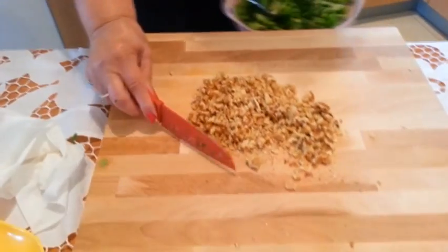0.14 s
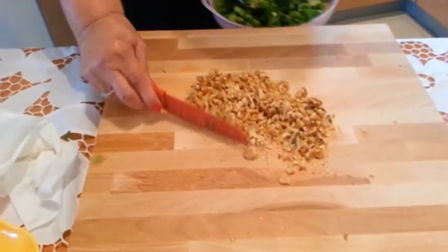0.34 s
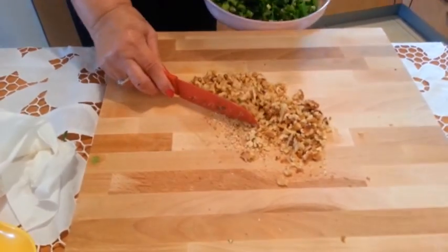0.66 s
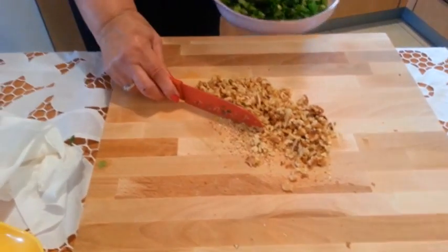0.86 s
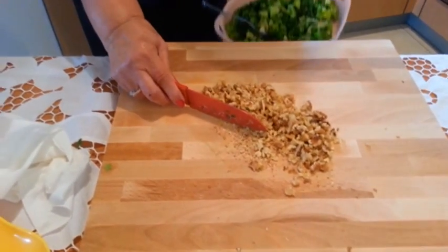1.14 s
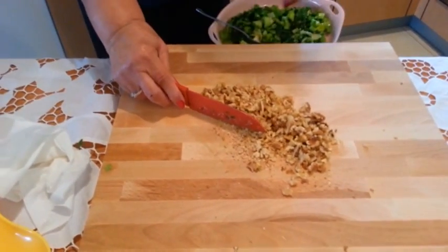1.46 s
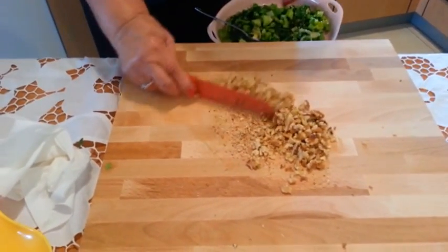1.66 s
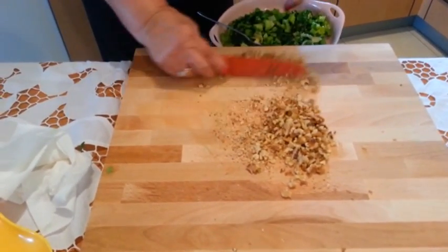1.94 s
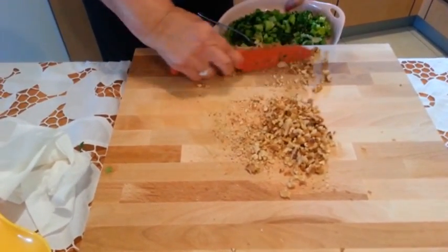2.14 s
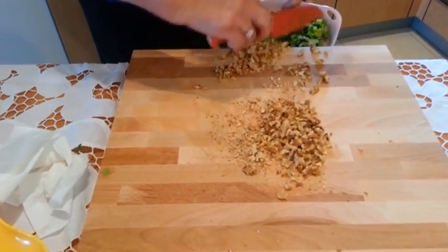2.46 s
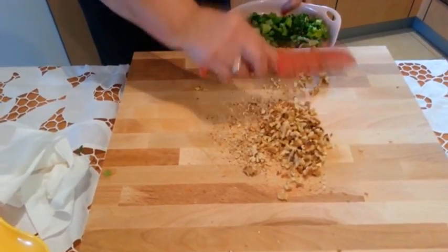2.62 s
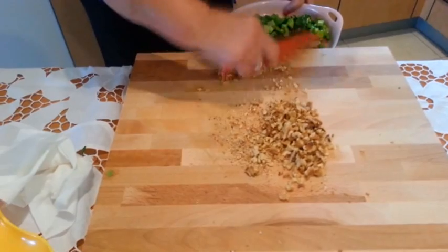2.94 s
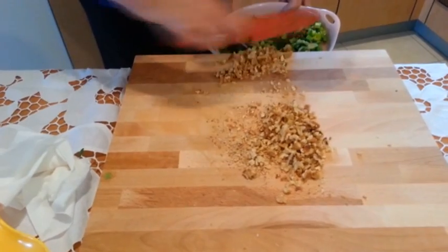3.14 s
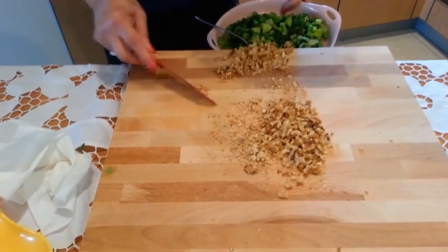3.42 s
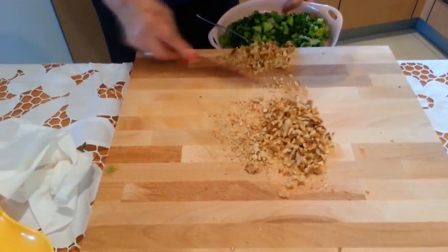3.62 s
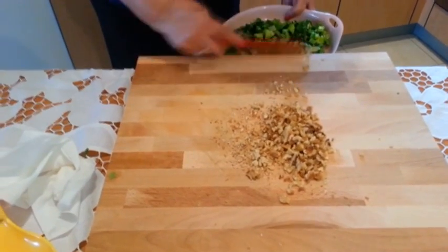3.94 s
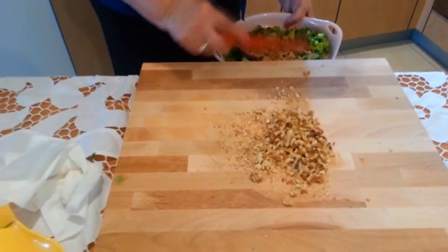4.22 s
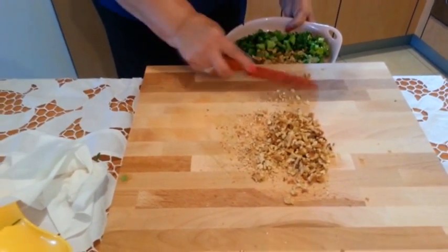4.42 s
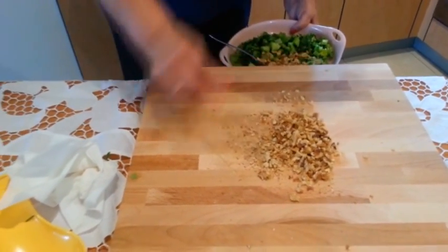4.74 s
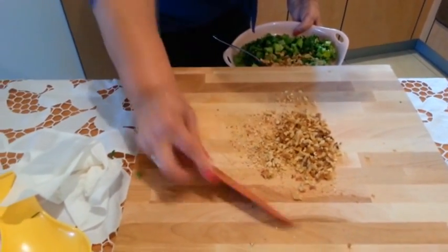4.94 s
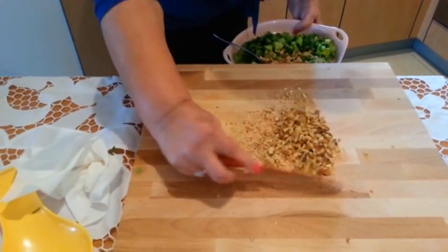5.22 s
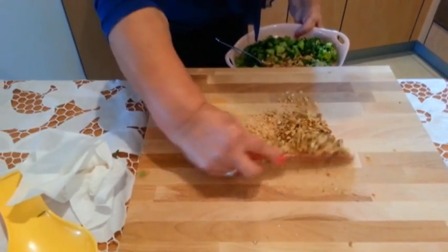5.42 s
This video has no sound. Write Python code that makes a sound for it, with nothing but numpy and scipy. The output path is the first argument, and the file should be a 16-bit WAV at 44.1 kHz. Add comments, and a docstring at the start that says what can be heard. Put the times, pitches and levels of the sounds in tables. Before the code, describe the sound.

Gritty sweeps of a blade pushing nut pieces across wood, with faint bowl clinks, hard woody knocks and a final rasp over a wavering low hum.

```python
"""A small kitchen: a knife sweeps chopped walnuts across a wooden board and over its edge into a bowl.
The blade rasps as noisy contacts ring crumb and blade resonances; knocks, bumps and faint bowl clinks
are sums of dying modes, some with noise; snaps are short noise bursts and squeals are narrow noise.
Echoes answer the work over a wavering sine hum, a noisy rumble and drone, and faint hiss."""
import sys
import numpy as np
from scipy import signal
from scipy.fft import rfft, irfft, next_fast_len
from scipy.io import wavfile
from scipy.ndimage import map_coordinates

SR = 44100
rng = np.random.default_rng(int(sys.argv[2]) if len(sys.argv) > 2 else 0)


def dump(signal):
    """Clip the signal to [-1, 1] and save it as 16-bit WAV at the path in sys.argv[1]."""
    limited = np.clip(np.atleast_2d(signal).T, -1, 1)
    pcm = np.round(limited * 32767).astype(np.int16)
    wavfile.write(sys.argv[1], SR, pcm)


N = 245637
TIME = np.arange(N) / SR

# resonances of the blade: [f/Hz, width/Hz, relative level/dB]
BLADE_MODES = [(2030, 135, -0.5), (3340, 150, -6), (4043, 130, 3), (4460, 160, -12), (5150, 160, 0),
               (5630, 150, -7.5), (6470, 130, 2), (7170, 95, -2), (7700, 105, 2.5), (8400, 56, 4),
               (10040, 320, 8.5), (12000, 260, 7.5), (13300, 320, -1.5)]
# colour of the rasp in a long sweep, also of a snapping nut: [f/Hz, relative level/dB]
SWEEP_SPECTRUM = [(760, -5.5), (1300, -0.5), (1640, -12), (1960, -5), (2600, -8.5), (4400, -10),
                  (5500, -4.5), (6500, -8.5), (7400, -5.5), (10200, -21.5), (12100, -18.5), (15000, -40)]


def from_db(db):
    """Decibels to gain."""
    return 10 ** (np.asarray(db) / 20)


def rms_one(x):
    """Scale to rms 1."""
    return x / np.sqrt(np.mean(x ** 2) + 1e-20)


def attack_one(x):
    """Scale to rms 1 over the first 10 ms."""
    return x / np.sqrt(np.mean(x[:SR // 100] ** 2))


def at_hz(points, hz):
    """Read a table on a log-frequency axis."""
    f, value = np.transpose(points)
    return np.interp(np.log(np.maximum(hz, 1)), np.log(f), value)


def add(out, s, sound):
    """Mix a sound in at time s."""
    at = max(0, round(s * SR))
    out[at:at + len(sound)] += sound[:N - at]


def drift(rate):
    """Smooth random wandering of rms 1 through rate new values a second."""
    knots = rng.standard_normal(4096)
    coarse = map_coordinates(knots, [TIME[::32] * rate], order=3, mode="wrap")
    return rms_one(coarse).repeat(32)[:N]


def colour(x, spectrum):
    """Causal (minimum-phase) filter that follows a spectrum."""
    size = 2 * next_fast_len(len(x))
    bins_hz = np.arange(size // 2 + 1) * SR / size
    cepstrum = irfft(np.log(from_db(at_hz(spectrum, bins_hz))))
    # folding the cepstrum onto positive time makes the phase minimal
    cepstrum[1:size // 2] *= 2
    cepstrum[size // 2 + 1:] = 0
    return irfft(rfft(x, size) * np.exp(rfft(cepstrum)))[:len(x)]


def resonance(x, hz, width):
    """Two-pole resonance with gain 1 on top; a narrower width (Hz) rings longer."""
    r = np.exp(-np.pi * width / SR)
    zeros = np.array([1, 0, -1]) * (1 - r * r) / 2
    poles = [1, -2 * r * np.cos(2 * np.pi * hz / SR), r * r]
    return signal.lfilter(zeros, poles, x + 1e-18)


def favour(hz, centre_hz, per_octave_db):
    """A contact wakes the modes near its own pitch best; dB."""
    return -per_octave_db * np.abs(np.log2(np.asarray(hz) / centre_hz))


def struck(modes, vary_db, scatter_rad=0):
    """Modes rung by one blow, each of random strength; scattered phases soften the first peak. Peak 1."""
    t = TIME[:SR // 2]
    y = 0
    for hz, db, t60 in modes:
        fall = from_db(db + vary_db * rng.normal() - 60 * t / t60)
        y = y + fall * np.sin(2 * np.pi * hz * t + scatter_rad * rng.normal())
    y = y * np.minimum(t / .0003, 1)   # 0.3 ms attack
    return y / np.abs(y).max()


def burst(t60):
    """Half a second holding the dying noise of one contact."""
    t = TIME[:SR // 2]
    return rng.standard_normal(len(t)) * from_db(-60 * t / t60)


def room_tone(rumble_db, drone_db, waver_db, waver_rad):
    """A sine hum wavers in level and phase inside a slowly swelling low drone and rumble, under hiss."""
    # noise colours of the room: [f/Hz, relative level/dB]
    rumble_colour = [(20, -37), (38, -30), (52, -4.5), (62, 4.5), (78, -9.5), (95, 15.5), (112, -4.5),
                     (135, 8.5), (200, -77)]
    drone_colour = [(90, -42), (125, -0.5), (150, 4), (190, 1), (250, -3), (320, -12), (380, -14),
                    (450, -27), (700, -56.5)]
    air_colour = [(30, -33), (300, 5), (700, 2), (1300, -9), (2200, -9.5), (4000, -19), (8000, -21.5),
                  (14300, -34), (15100, -57)]
    # slow swells, before their trims: [t/s, level/dB]
    rumble_swell = [(0.0, -42.5), (2.89, -47), (3.68, -35), (3.79, -41.5), (4.82, -29.5), (4.87, -40),
                    (5.57, -38)]
    drone_swell = [(0.0, -42), (0.15, -40), (3.85, -30.5), (4.37, -37.5), (4.44, -30.5), (5.57, -31)]
    hum_hz, hum_db, air_db = 151.5, -42.5, -52

    def noise(spectrum):
        """Steady coloured noise of rms 1."""
        return rms_one(colour(rng.standard_normal(N), spectrum))

    rumble = from_db(np.interp(TIME, *np.transpose(rumble_swell)) + rumble_db) * noise(rumble_colour)
    drone = from_db(np.interp(TIME, *np.transpose(drone_swell)) + drone_db) * noise(drone_colour)
    hum_phase = 2 * np.pi * hum_hz * TIME + waver_rad * drift(rate=4.0)
    hum = from_db(hum_db + waver_db * drift(rate=8.1)) * np.sin(hum_phase)
    return rumble + drone + hum + from_db(air_db) * noise(air_colour)


def kitchen(x, first_echo_s):
    """Diffuse echoes from the walls build up after a short gap; each band dies at its own rate."""
    # decay of the room: [f/Hz, t60/s]
    room_decay = [(150, 1), (600, 0.43), (1500, 0.5), (4000, 0.44), (10000, 0.3)]
    t, tail = TIME[:SR * 3 // 4], 0
    edges = np.geomspace(70, 17000, 9)
    for low, high in zip(edges, edges[1:]):
        band_filter = signal.butter(2, [low, high], "band", fs=SR, output="sos")
        band = signal.sosfilt(band_filter, rng.standard_normal(len(t)))
        tail = tail + band * from_db(-60 * t / at_hz(room_decay, np.sqrt(low * high)))
    tail = tail * np.minimum(t / first_echo_s, 1) ** 4
    return signal.fftconvolve(x, tail / np.sqrt(np.sum(tail ** 2)))[:N]


def bumps(level_db):
    """Soft blows that only wake the table's low modes; the deepest bass is cut away."""
    # dull bumps, before trim and bass cut: [t/s, level/dB]
    bump_times = [(0.106, -29.5), (1.188, -22.5), (5.143, -28)]
    # low modes of the table: [f/Hz, relative level/dB, t60/s]
    table_modes = [(150, -2, 0.086), (185, -10, 0.085), (235, 1.5, 0.06), (336, -5, 0.048)]
    out = np.zeros(N)
    for s, db in bump_times:
        add(out, s, from_db(db + level_db) * struck(table_modes, vary_db=9))
    return signal.sosfilt(signal.butter(2, 100, "high", fs=SR, output="sos"), out)


def clinks(level_db, contact_db, settle_s):
    """Light, rattling touches build up for a moment and ring the bowl, whose close modes beat."""
    # clinks in the bowl, before the trim: [t/s, level/dB, centre of the ring f/Hz]
    clink_times = [(0.106, -23, 3200), (0.114, -22.5, 3930), (0.123, -26.5, 4900), (0.899, -47.5, 4900),
                   (0.946, -45, 3400), (2.163, -35, 3400), (2.725, -37, 3780), (3.042, -33, 3900),
                   (3.109, -31, 5230), (3.197, -39.5, 4600), (4.017, -26, 2640), (4.06, -33.5, 3601)]
    # modes of the bowl: [f/Hz, relative level/dB, t60/s]
    bowl_modes = [(1730, 0, 0.12), (1975, 4, 0.12), (2640, -1.5, 0.29), (2744, 2.5, 0.16), (3200, -6, 0.11),
                  (3580, -1.5, 0.16), (3860, -0.5, 0.093), (4900, 1, 0.22), (5070, -5, 0.2),
                  (5750, -4, 0.14), (6505, 0, 0.15)]
    # colour of the touch itself: [f/Hz, relative level/dB]
    rattle_colour = [(300, 7), (1400, -1.5), (2300, 4.5), (5500, 0.5), (9000, -9), (14000, -41)]
    out = np.zeros(N)
    settle = np.minimum(TIME[:SR // 2] / settle_s, 1)
    for s, db, centre_hz in clink_times:
        modes = [(hz, level + favour(hz, centre_hz, per_octave_db=4.5), t60)
                 for hz, level, t60 in bowl_modes]
        rattle = from_db(contact_db) * attack_one(colour(burst(t60=0.1), rattle_colour))
        ring = struck(modes, vary_db=3.0, scatter_rad=1.86)
        add(out, s, from_db(db + level_db) * settle * (ring + rattle))
    return out


def snaps(level_db):
    """Dry noise ticks of single nut pieces that snap under the blade or tumble off the edge."""
    # loudest snaps, before the trim: [t/s, rms level of the first 10 ms/dB]
    snap_times = [(0.795, -33), (1.188, -26), (1.345, -42), (1.518, -31), (1.726, -18), (1.954, -21),
                  (2.053, -24), (2.212, -32), (2.406, -33), (2.455, -38), (2.485, -35), (2.869, -23.5),
                  (3.328, -37)]
    out = np.zeros(N)
    for s, db in snap_times:
        add(out, s, from_db(db + level_db) * attack_one(colour(burst(t60=0.075), SWEEP_SPECTRUM)))
    return out


def squeals(fade_s):
    """Friction feeds one mode of the sliding blade for a moment: noise through a narrow resonance, twice."""
    # brief singing of the blade: [start t/s, end t/s, f/Hz, rms level/dB]
    squeal_times = [(3.59, 3.65, 6545, -39), (3.86, 3.884, 8446, -38), (5.295, 5.33, 8446, -43)]
    width_hz = 250   # of each resonance
    out = np.zeros(N)
    for start, end, hz, db in squeal_times:
        touch = np.clip(np.minimum(TIME - start, end - TIME) / fade_s + .5, 0, 1)
        once = resonance(rng.standard_normal(N), hz, width_hz)
        tone = resonance(once, hz, width_hz)
        out += touch * from_db(db) * rms_one(tone)
    return out


def blade_tick(centre_hz, ring_db):
    """A short bright contact and the blade's ring, both strongest near one pitch before a shared colour."""
    # colour of the whole tick: [f/Hz, relative level/dB]
    tick_colour = [(1800, 4.5), (3500, 2.5), (10000, -7.5), (15500, -25)]
    octaves_hz = centre_hz * 2. ** np.arange(-2, 3)
    contact_colour = [(hz, favour(hz, centre_hz, per_octave_db=2.0)) for hz in octaves_hz]
    contact = colour(burst(t60=0.028), contact_colour)
    ring = 0
    for hz, width, db in BLADE_MODES:
        gain = from_db(ring_db + db + favour(hz, centre_hz, per_octave_db=49))
        ring = ring + gain * resonance(contact, hz, width)
    return attack_one(colour(contact + ring, tick_colour))


def knocks(thud_db, board_db, crack_db, tick_db):
    """The blade lands: contact thuds and cracks, board and blade ring. Gives (board, contact, blade)."""
    # blade on board, levels before their trims: [t/s, thud level/dB, board ring level/dB,
    # board ring centre f/Hz, crack level/dB, blade tick level/dB, blade tick centre f/Hz]
    knock_times = [(1.187, -26, -32, 450, -30, -50, 1500), (1.718, -24, -30, 612, -31, -54, 5600),
                   (3.385, -14, -23, 753.8, -28, -43, 1800), (3.737, -22, -20, 760, -18, -28, 6300),
                   (3.752, -24, -11, 710, -38, -47, 6350), (3.884, -22, -20.5, 800, -33, -29, 7900),
                   (4.41, -10.5, -12, 776, -7, -22.5, 4695), (4.44, -7, -25, 745, -9.5, -25.5, 6550),
                   (4.473, -9, -20, 748, -10.5, -21.5, 8700), (4.926, -8.5, -17, 870, -9.5, -23, 4300),
                   (4.94, -16, -12, 850, -10, -26, 4450), (5.059, -24, -36, 750, -30, -29.5, 4900),
                   (5.086, -7, -6, 820, -13, -32.5, 4460), (5.101, -26, -32, 900, -23, -30.5, 4140),
                   (5.111, -18, -29, 600, -20, -28.5, 4600), (5.126, -21, -24, 800, -25, -35.5, 4650),
                   (5.144, -5, -4, 545, -12, -29.5, 7060), (5.158, -24, -26, 650, -27, -42, 5000),
                   (5.171, -18, -20, 443, -30, -31.5, 6450), (5.232, -14, -20, 800, -32, -33, 4900),
                   (5.266, -4, -10, 660, -16, -24, 3000), (5.293, -30, -21, 600, -24, -25, 8050)]
    # lasting board modes, damped thud at the contact, short-lived upper modes woken by a sharp
    # contact: [f/Hz, relative level/dB, t60/s]
    board_modes = [(377, -10, 0.046), (460, -4.5, 0.12), (655, -5.5, 0.19), (699, 2, 0.13), (800, 6, 0.052),
                   (877, -3, 0.073), (995, -19, 0.12)]
    thud_modes = [(690, 4, 0.019), (800, 1, 0.022), (970, -1, 0.018)]
    crack_modes = [(1160, -1.5, 0.026), (1325, 1.5, 0.013), (1530, 2.5, 0.0097), (1800, 1.5, 0.016),
                   (2124, 0, 0.015), (2410, 1, 0.013)]
    soft_db_per_octave = 51   # a soft contact hardly wakes the modes above its own pitch
    board, contact, blade = np.zeros((3, N))
    for s, thud, ring, board_hz, crack, tick, blade_hz in knock_times:
        low_modes = [(hz, db + favour(hz, board_hz, per_octave_db=24.0), t60)
                     for hz, db, t60 in board_modes]
        high_modes = [(hz, db - soft_db_per_octave * max(0, np.log2(hz / blade_hz)), t60)
                      for hz, db, t60 in crack_modes]
        add(board, s, from_db(ring + board_db) * struck(low_modes, vary_db=8.5))
        add(contact, s, from_db(thud + thud_db) * struck(thud_modes, vary_db=3.5))
        add(contact, s, from_db(crack + crack_db) * struck(high_modes, vary_db=2.5, scatter_rad=1.9))
        add(blade, s, from_db(tick + tick_db) * blade_tick(blade_hz, ring_db=11.5))
    return board, contact, blade


def grains(per_s, spread_db):
    """Tiny contacts at random times, of random sign and exponentially scattered dB size; rms 1."""
    sizes = from_db(spread_db * np.minimum(rng.exponential(1, N), 4)) * rng.choice([-1, 1], N)
    return rms_one(sizes * (rng.random(N) < per_s / SR))


def crumbs(contacts, cycles, shift_db, count=20):
    """Each contact rings one crumb size for a few cycles; sizes crunch in clusters, so the pitch hops."""
    dealt = rng.integers(0, count, N)
    out = 0
    for k, hz in enumerate(np.geomspace(1500, 14000, count)):
        ring = resonance(contacts * (dealt == k), hz, hz / cycles)
        out = out + ring * from_db(shift_db * drift(rate=70))
    return rms_one(out)


def pressure(kind):
    """Strokes set in, swell to the hardest press (or dip, if negative), lift off. Gives (rasp, board) gains."""
    # strokes of the blade, levels before their trims: [start t/s, hardest press t/s, end t/s,
    # rasp level/dB, board drone level/dB, swell level/dB, kind]
    stroke_times = [(-0.02, 0.0, 0.082, -39.5, -48.5, 11, "nudge"),
                    (0.097, 0.167, 0.22, -45.5, -41.5, -6.5, "nudge"),
                    (0.253, 0.308, 0.32, -34, -38, 2.5, "nudge"),
                    (0.325, 0.453, 0.61, -39.5, -40, -0.5, "nudge"),
                    (0.79, 0.812, 0.94, -54.5, -56, 5, "brush"),
                    (1.527, 1.638, 1.767, -39.5, -36.5, 6, "sweep"),
                    (1.727, 1.78, 1.882, -34, -34, 3, "sweep"),
                    (1.89, 1.923, 2.01, -32.5, -37.5, 6.5, "sweep"),
                    (1.976, 2.006, 2.23, -43, -47, 8, "spill"), (2.209, 2.217, 2.3, -46, -65, 7, "spill"),
                    (2.34, 2.465, 2.61, -50.5, -64, 9, "spill"),
                    (2.765, 2.85, 2.96, -40.5, -45, 5.5, "sweep"),
                    (3.493, 3.54, 4.03, -32.5, -39.5, 13, "shove"),
                    (3.545, 3.627, 3.65, -30, -32, 8, "shove"), (3.671, 3.735, 3.79, -29, -24, 5, "shove"),
                    (3.794, 3.857, 3.885, -28.5, -30.5, 2.5, "shove"),
                    (3.96, 4.04, 4.06, -42.5, -62.5, 3, "brush"), (4.94, 4.93, 5.09, -27, -25.5, 8, "skid"),
                    (5.1, 5.157, 5.18, -39, -36, 9, "skid"), (5.29, 5.452, 5.74, -32, -28.5, 6.5, "gather")]
    attack_s, release_s = 0.03, 0.016
    board_swell_db = 3.5   # the board answers to pressure more than the crumbs do
    surge_db, surges_per_s = 0.32, 24   # the heap gives way unevenly
    rasp, board = np.zeros((2, N))
    for start, hardest, end, rasp_db, board_db, swell_db, row_kind in stroke_times:
        if row_kind != kind:
            continue
        set_in = np.clip((TIME - start) / attack_s + .5, 0, 1)
        lift_off = np.clip((end - TIME) / release_s + .5, 0, 1)
        touch = set_in * lift_off
        ease = np.interp(TIME, [start, hardest, end], [1, 0, 1])
        rasp += touch * from_db(rasp_db - swell_db * ease)
        board += touch * from_db(board_db - (swell_db + board_swell_db) * ease)
    return np.array([rasp, board]) * from_db(surge_db * drift(rate=surges_per_s))


def stroke(kind, spectrum, rasp_db, board_db, per_s, spread_db, catch_db, ring_db, dull_db=0):
    """Crumbs catch and slip under the edge; the same contacts drive the blade and the board."""
    # the board under a dragging blade: [f/Hz, relative level/dB]
    rub_colour = [(70, -44.5), (230, -16.5), (350, -9.5), (440, -11), (550, -3), (660, 0.5), (790, 2),
                  (920, -9), (1100, -3.5), (1400, -23.5), (1900, -28), (3000, -57)]
    contacts = grains(per_s, spread_db) * from_db(catch_db * drift(rate=80))
    # the blade's resonances come and go as the point of contact wanders
    steel = rms_one(sum(from_db(db + 3.5 * drift(rate=28)) * resonance(contacts, hz, width)
                        for hz, width, db in BLADE_MODES))
    crunch = crumbs(contacts, cycles=12.0, shift_db=4.0)
    rasp = rms_one(colour(crunch + from_db(ring_db) * steel, spectrum))
    # a light touch is duller on the wood: dull_db per octave
    wood_colour = [(hz, db - dull_db * np.log2(hz)) for hz, db in rub_colour]
    wood = rms_one(colour(contacts, wood_colour))
    rasp_gain, board_gain = pressure(kind)
    return rasp * rasp_gain * from_db(rasp_db) + wood * board_gain * from_db(board_db)


def scraping():
    """Light tip strokes, faint brushes, long sweeps, spilling pieces, hard shoves, skids and a gathering."""
    # colour of the rasp in each kind of stroke: [f/Hz, relative level/dB]
    nudge_colour = [(760, 10.5), (1300, 3), (1820, -11.5), (2020, -3), (3890, -11), (8370, -3.5),
                    (11000, -23.5), (12200, -18), (15000, -35)]
    brush_colour = [(760, -2), (2000, 0), (3500, -3), (6500, -0.5), (9000, -8), (12000, -15.5),
                    (15000, -40)]
    shove_colour = [(760, -47), (1300, 7), (1450, -15.5), (2310, -3), (4400, -2.5), (5970, -0.5), (6550, 0),
                    (8300, -5), (10000, -14), (12200, -16.5), (15000, -37)]
    skid_colour = [(760, -21), (1300, -6), (3300, -14), (4150, -8), (7870, -17), (11100, -33), (14100, -30),
                   (15000, -70)]
    gather_colour = [(760, -16), (1300, 1.5), (3580, -5.5), (5170, 4), (6100, -8), (6620, -2),
                     (9960, -14.5), (14300, -26), (15000, -40)]
    nudge = stroke("nudge", nudge_colour, rasp_db=-4.5, board_db=-0.5, per_s=2800, spread_db=1.5,
                   catch_db=1.5, ring_db=0.0, dull_db=9.5)
    brush = stroke("brush", brush_colour, rasp_db=-3.5, board_db=3.5, per_s=2400, spread_db=0.5,
                   catch_db=1.0, ring_db=-7, dull_db=5.5)
    sweep = stroke("sweep", SWEEP_SPECTRUM, rasp_db=-1.0, board_db=-2.5, per_s=2000, spread_db=1.7,
                   catch_db=2.0, ring_db=2.5, dull_db=4.5)
    spill = stroke("spill", brush_colour, rasp_db=-2.5, board_db=-0.5, per_s=2100, spread_db=1.0,
                   catch_db=3.5, ring_db=-6)
    shove = stroke("shove", shove_colour, rasp_db=-3.5, board_db=-4.0, per_s=2100, spread_db=1.5,
                   catch_db=1.5, ring_db=1.5)
    skid = stroke("skid", skid_colour, rasp_db=-6.5, board_db=-4.0, per_s=4400, spread_db=-0.5,
                  catch_db=0.5, ring_db=-1.0)
    gather = stroke("gather", gather_colour, rasp_db=-0.5, board_db=-4.5, per_s=4500, spread_db=1,
                    catch_db=2.0, ring_db=1.0)
    return nudge + brush + sweep + spill + shove + skid + gather


def scene():
    """The work on the board, its echo in the kitchen and the room tone."""
    room = room_tone(rumble_db=1.5, drone_db=0.5, waver_db=6.5, waver_rad=0.74)
    rubbed = scraping() + snaps(level_db=-17.0) + squeals(fade_s=0.01)
    board, contact, blade = knocks(thud_db=-2.5, board_db=-1.0, crack_db=-2.0, tick_db=-1.0)
    wood = board + bumps(level_db=10.5)
    bright = blade + clinks(level_db=-2.0, contact_db=-9.5, settle_s=0.0034)
    # each group reaches the walls at its own level
    to_walls = (from_db(-6.0) * rubbed + from_db(-11) * wood
                + from_db(-2.0) * contact + from_db(-6.5) * bright)
    echo = kitchen(to_walls, first_echo_s=0.012)
    return (rubbed + wood + contact + bright + echo + room)[None]


def record(dry):
    """The hardest knocks overload and are rounded off; the top is cut."""
    ceiling, cutoff_hz = .43, 15600
    held = dry / (1 + (dry / ceiling) ** 6) ** (1 / 6)
    return signal.sosfilt(signal.ellip(10, .2, 80, cutoff_hz, fs=SR, output="sos"), held)


dry = scene()
out = record(dry)
dump(out)
```